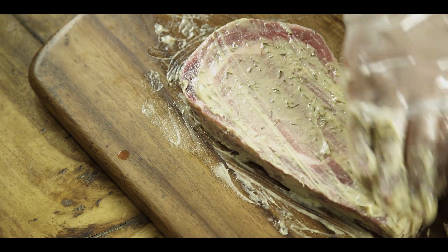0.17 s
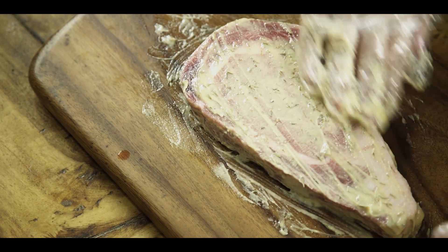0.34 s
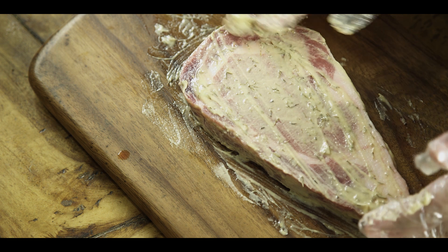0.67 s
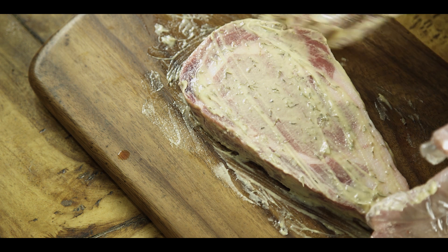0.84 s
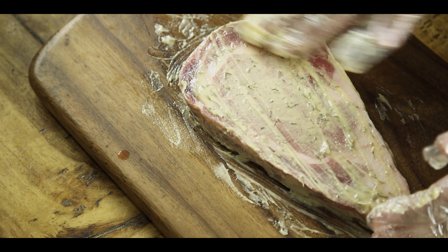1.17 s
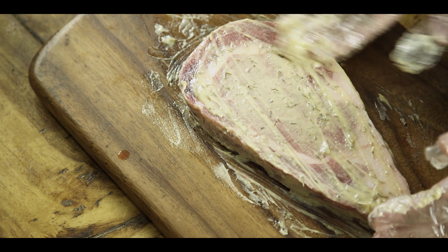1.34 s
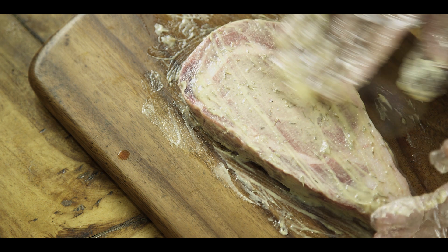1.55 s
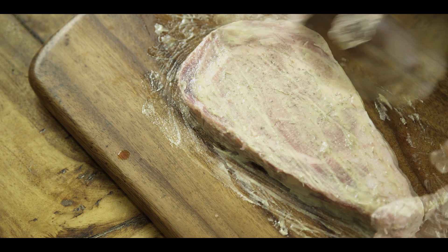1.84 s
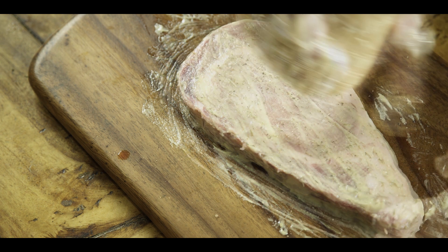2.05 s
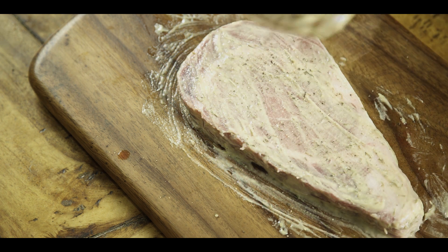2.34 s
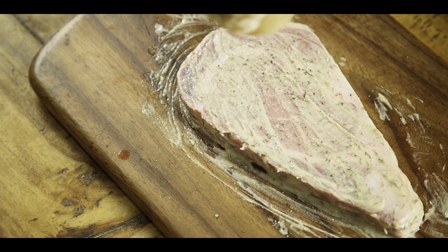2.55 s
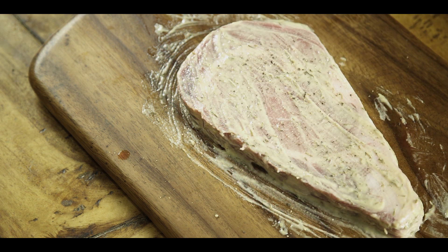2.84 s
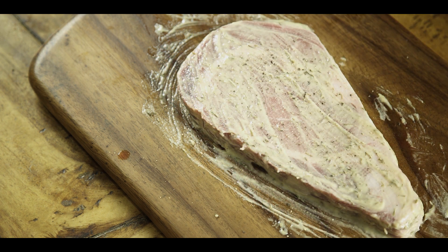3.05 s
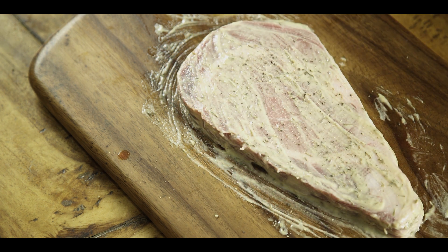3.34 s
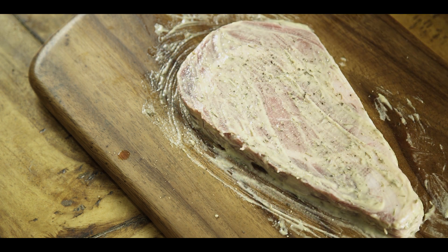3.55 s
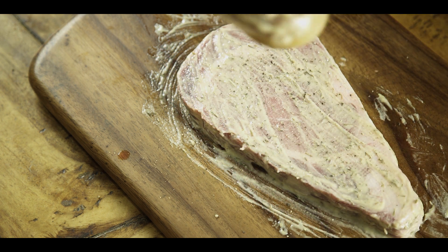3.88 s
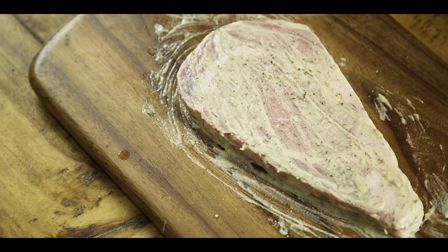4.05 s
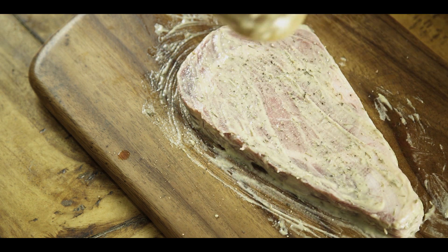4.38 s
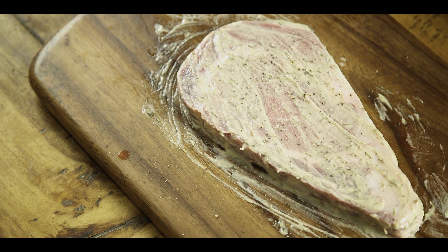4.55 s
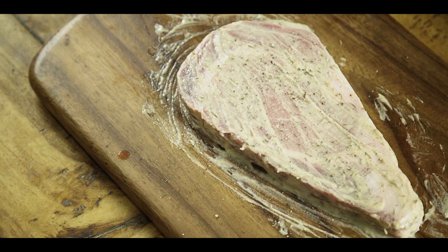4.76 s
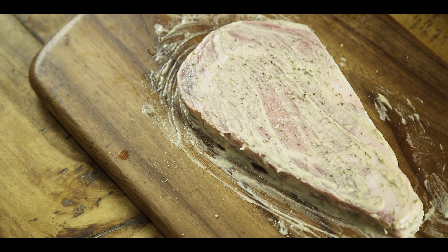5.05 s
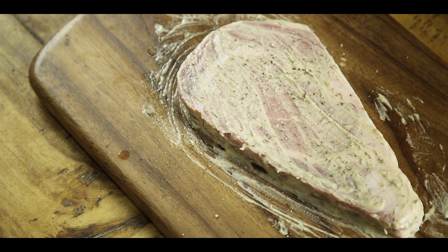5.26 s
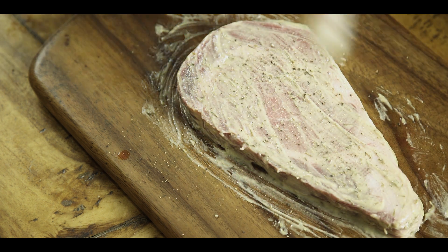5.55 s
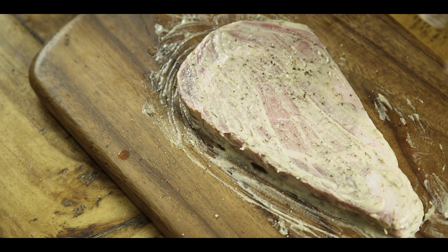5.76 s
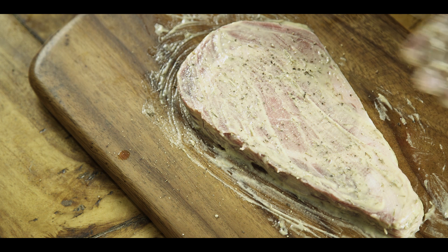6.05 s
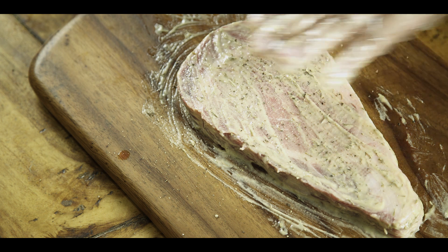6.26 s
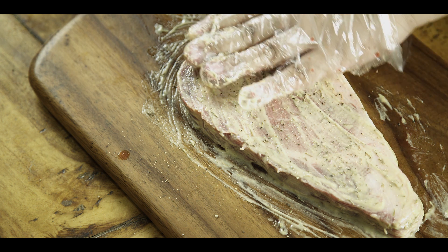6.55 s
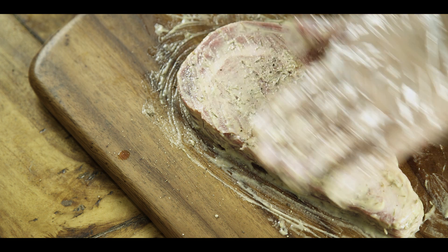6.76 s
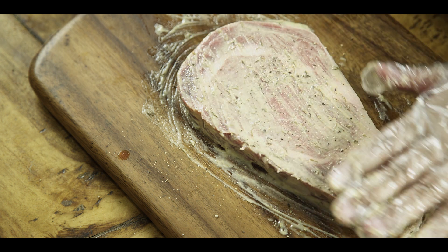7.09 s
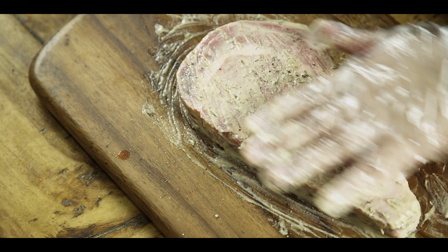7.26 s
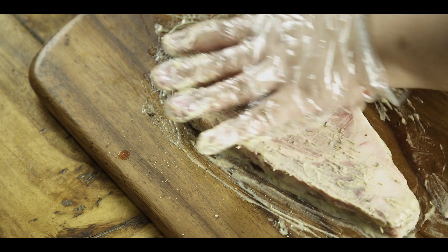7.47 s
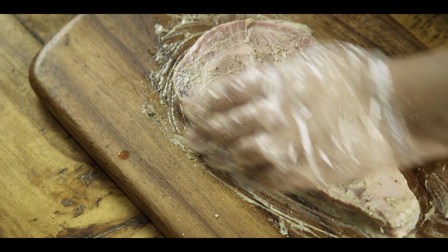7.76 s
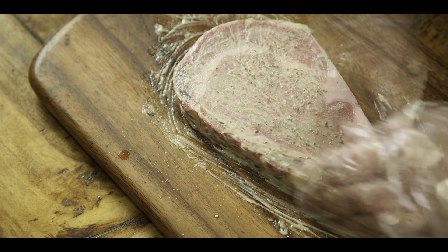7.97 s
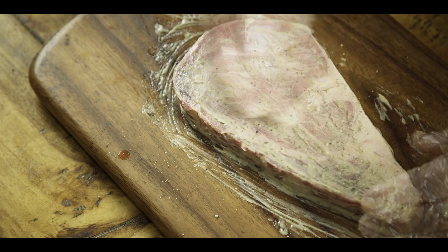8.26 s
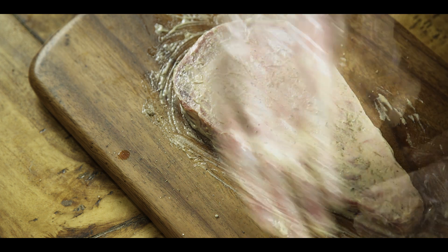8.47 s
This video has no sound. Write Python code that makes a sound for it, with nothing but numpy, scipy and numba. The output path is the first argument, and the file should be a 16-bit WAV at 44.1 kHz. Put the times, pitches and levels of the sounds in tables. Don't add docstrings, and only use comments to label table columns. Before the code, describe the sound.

Bright crackling film, full of tiny pops, swells with each hand stroke. After a couple of seconds the sound turns hollow and wetter as fingers scoop paste from a bowl about four times a second. A sudden dull double thump on the counter follows, with small rocking notes dying away. The glove then rubs the meat again, with slower strokes. Small hard-walled kitchen, close microphone, faint fridge hum.

```python
import sys
import numpy as np
from scipy import signal
from scipy.fft import rfft, irfft, next_fast_len
from scipy.io import wavfile
from scipy.ndimage import map_coordinates
from numba import njit

SR = 44100
rng = np.random.default_rng(int(sys.argv[2]) if len(sys.argv) > 2 else 0)


def ratio_of_db(decibels):
    return 10 ** (np.asarray(decibels, float) / 20)


def persist_wave(psi):
    counts = np.round(np.clip(psi, -1, 1) * 32767).astype(np.int16)
    wavfile.write(sys.argv[1], SR, np.atleast_2d(counts).T)


N = 380583


def level(x, db):
    return x * ratio_of_db(db) / np.sqrt(np.mean(x ** 2))


def shape(table, hz):
    f, db = np.transpose(table)
    return np.interp(np.log(hz), np.log(f), db)


def coloured(gain, x=None):
    size = next_fast_len(N)
    hz = np.maximum(np.arange(size // 2 + 1) * SR / size, 1)
    if x is None:
        x = rng.standard_normal(size)
    return irfft(rfft(x, size) * gain(hz), size)[:N]


def highpass(x, order, hz):
    return signal.sosfilt(signal.butter(order, hz, "high", fs=SR, output="sos"), x)


@njit
def rings(s, size, hz, t60, phase):
    out = np.zeros(N)
    for k in range(len(s)):
        z = size[k] * np.exp(1j * phase[k])
        turn = np.exp((2j * np.pi * hz[k] - np.log(1000) / t60[k]) / SR)
        start = int(s[k] * SR)
        for j in range(start, min(N, start + int(t60[k] * SR))):
            out[j] += z.imag
            z *= turn
    return out


def glove():
    # pitch_hz, density_db
    meat_bands = [(180, -40.5), (300, -7), (600, -8.5), (1200, -9), (2000, -8), (2550, -7.5), (2850, -6),
                  (4200, -2.5), (5790, 0), (7000, -4.5), (8500, -6.5), (12800, -5), (14300, -11),
                  (15700, -18)]
    # pitch_hz, density_db
    bowl_bands = [(200, -28.5), (300, -9), (500, -5.5), (850, -17), (1160, -13.5), (1400, -7.5),
                  (2230, -13), (2450, -6), (3000, -5), (4100, -6.5), (4450, -2), (5700, -0.5), (9340, -10),
                  (13000, -6), (15700, -15)]
    # time_s, share_inside_bowl (0-1)
    in_bowl = [
        (1.85, 0.2),
        (2, 0.76),
        (5.6, 0.86),
        (5.8, 0.02),
    ]
    # time_s, level_db
    crackle = [(0, 0), (.95, 0), (1.08, 2), (1.85, 1.5), (2, 0), (5.55, 0), (5.7, 3), (6.1, 3), (6.3, 0),
               (6.7, 2), (7.2, 2), (7.6, 0), (8.63, 1)]
    t = np.arange(N) / SR
    patches = rng.standard_normal((int(25 * N / SR) + 2, 13))
    fine = crinkle(patches, count=140000, fold=1, scatter_db=2.3, cycles=11.41, trim_db=(3, 9, 12), db=4.3)
    creases = crinkle(patches, count=1500, fold=10, scatter_db=2.6, cycles=9., trim_db=(1, 8, 12), db=5.6)
    film = fine + creases * ratio_of_db(np.interp(t, *np.transpose(crackle)))
    inside = np.clip(np.interp(t, *np.transpose(in_bowl)), 0, 1)
    over_meat = coloured(lambda f: ratio_of_db(shape(meat_bands, f)), film * (1 - inside))
    return over_meat + ratio_of_db(0.5) * coloured(lambda f: ratio_of_db(shape(bowl_bands, f)), film * inside)


def crinkle(patches, count, fold, scatter_db, cycles, trim_db, db):
    region_hz = [
        5200,
        11500,
        1800,
        500,
    ]
    folds = rng.random((count, 2))
    grains = rng.random((count, fold, 3))
    s = (folds[:, :1] * N / SR + .0009 * grains[..., 0]).ravel()
    hz = (320 + 15600 * grains[..., 1] ** 2).ravel()
    luck_db = np.repeat(-scatter_db * np.log(1.02 - folds[:, 1]), fold)
    t, film_db, *relative_db = hand()
    motion_db = np.interp(s, t, film_db)
    order = np.sort(region_hz)
    for k, centre in enumerate(region_hz[1:]):
        share = np.interp(np.log(hz), np.log(order), order == centre)
        material_db = np.interp(s, t, np.minimum(relative_db[k], 6)) + trim_db[k]
        motion_db = motion_db + share * material_db
    place = [s * SR / N * (len(patches) - 1), grains[..., 1].ravel() * 12]
    motion_db = motion_db + 2.6 * map_coordinates(patches, [s * SR / N * (len(patches) - 1), place[1]], order=1)
    size = ratio_of_db(db + motion_db + luck_db) * (hz / 5000) ** 0.9253
    flip = np.pi * (grains[..., 2].ravel() < .5)
    return rings(s, size, hz, cycles / hz, flip)


def hand():
    # peak_s, level_db,
    # rise_s and fall_s per 10 dB
    rubs = [(0.001, -43.5, 1.14, 0.09), (0.227, -46.5, 0.22, 0.07), (0.334, -46, 0.0063, 0.13),
            (0.548, -47, 0.5, 0.06), (0.681, -38.5, 0.09, 0.147), (0.843, -41, 0.03, 0.0765),
            (1.104, -46.5, 0.0743, 0.063), (1.223, -44.5, 0.0423, 0.1455), (1.433, -52.5, 0.06, 0.12),
            (1.6, -47, 0.15, 0.065), (1.752, -48.5, 0.05, 0.307), (5.332, -32.5, 0.0827, 0.0482),
            (5.52, -41, 0.1851, 0.085), (5.89, -52.5, 0.48, 0.46), (6.306, -40.5, 0.0647, 0.1221),
            (6.467, -45.5, 0.0275, 0.17), (6.937, -49.5, 0.5, 0.2), (7.313, -44.5, 0.2147, 0.67),
            (7.709, -35.5, 0.0839, 0.22), (8.045, -49.5, 0.24, 0.12), (8.192, -46.5, 0.12, 0.22),
            (8.489, -46.5, 0.15, 0.0351), (8.632, -49.5, 0.08, 0.32)]
    # start_s, hold_s, level_db
    scoops = [(2.014, 0.0723, -41.5), (2.193, 0.07, -46), (2.472, 0.0098, -39), (2.632, 0.11, -45.5),
              (2.892, 0.075, -40.5), (3.075, 0.087, -44.5), (3.3, 0.115, -43), (3.556, 0.105, -41.5),
              (3.787, 0.105, -42), (4.045, 0.12, -44), (4.277, 0.0443, -39.5), (4.469, 0.12, -43.5),
              (4.676, 0.054, -43.5), (4.858, 0.1686, -46), (5.126, 0.082, -41.5)]
    # peak_s, level_db, fall_s per 10 dB
    openings = [(.335, -43, 0.05), (.42, -52.5, 0.11), (1.14, -51.5, 0.15), (1.43, -54.5, .1),
                (1.765, -46.5, 0.0432), (2.26, -48.5, 0.06), (3.15, -49, 0.06), (4.225, -49, 0.27),
                (4.69, -45, 0.11), (5.52, -44, 0.0667), (6.97, -53, 0.2), (7.72, -39, 0.04),
                (8.48, -54, .03), (1.2, -52, .05), (6.25, -54, .05), (2.48, -46, .06), (3.35, -49, .06),
                (3.84, -49, .07), (5.7, -56, .3), (2.74, -50, .05), (5.05, -53, .1), (6.66, -54, .06),
                (7.18, -54, .05), (4.13, -52, .06), (3.44, -53, .05), (4.55, -50, .1), (5.44, -50, .1),
                (6.75, -55, .3), (7.3, -53, .3), (2.94, -47, .05), (3.65, -47, .04)]
    # peak_s, wet_db, push_db, fall_s per 10 dB
    squelches = [(.35, -47.5, -61, 0.14), (2.26, -45.5, -51.5, 0.0134), (2.08, -52, -55, .04),
                 (2.73, -47, -56, .04), (4.5, -50, -52, .06), (2.91, -54.5, -52.5, 0.0553),
                 (3.15, -44.5, -49, 0.0778), (3.39, -52.5, -53, 0.0261), (3.67, -45.5, -50, 0.0254),
                 (4.12, -43, -51, 0.0052), (4.59, -42.5, -50, 0.0364), (4.69, -47, -48, 0.03),
                 (4.96, -44, -50, .06), (5.17, -46, -70, .25), (5.74, -53, -64, .15), (8.05, -53, -62, .08),
                 (5.36, -40, -71, 0.0849), (5.55, -42, -72.5, 0.0623), (6.11, -50, -45, 0.32),
                 (.68, -50, -60, .1), (6.75, -54, -62, .2), (6.5, -52, -62, .08), (.08, -51, -56, .06),
                 (.23, -53, -62, .05), (.75, -50, -56, .12), (7.98, -54, -62, .05), (8.52, -54, -58, .05),
                 (7.33, -52, -60, .1), (7.71, -43, -56, .1)]
    # level_db at an average stroke, slope (dB per dB of film)
    followers = [
        (-54, 1.0),
        (-55.5, .65),
        (-61, .4),
    ]
    average_db = -47
    t = np.arange(0, N / SR + .01, .004)
    s, db, rise_s, fall_s = np.transpose(rubs)
    rubbing = swells(t, s, db, 10 / rise_s, 10 / fall_s)
    start, hold_s, db = np.transpose(scoops)
    scooping = swells(t, start, db, 200, 158, hold_s)
    film_db = 10 * np.log10(rubbing + scooping)
    crisp, wet, push = (ratio_of_db(mean_db + slope * (film_db - average_db)) ** 2 for mean_db, slope in followers)
    push = push * ratio_of_db(-14 * (t > 5.05) * (t < 5.66)) ** 2
    wet = wet * ratio_of_db(-1.5 * (t > 1.03) * (t < 1.5)) ** 2
    s, db, fall_s = np.transpose(openings)
    crisp = crisp + swells(t, s, db, 10 / .0343, 10 / fall_s)
    s, wet_db, push_db, fall_s = np.transpose(squelches)
    wet = wet + swells(t, s, wet_db, 10 / .0482, 10 / fall_s)
    push = push + swells(t, s, push_db, 10 / .0482, 10 / fall_s)
    return t, film_db, *(10 * np.log10(power) - film_db for power in (crisp, wet, push))


def swells(t, s, db, rise_db_s, fall_db_s, hold_s=0):
    late = t[:, None] - s
    drop_db = np.maximum(0, np.maximum(-late * rise_db_s, (late - hold_s) * fall_db_s))
    return (ratio_of_db(db - drop_db) ** 2).sum(axis=1)


def fold_snaps():
    # start_s, peak_db, ring_hz
    open_snaps = [(0.2064, -30, 5400), (0.2972, -30, 4130), (0.3398, -30, 5790), (0.5654, -28, 5730),
                  (0.618, -25, 4340), (0.8624, -27, 4220), (0.9239, -31, 5500), (0.9891, -42, 6240),
                  (1.0119, -40, 4820), (1.2341, -28, 6010), (1.2406, -32, 5840), (1.2621, -29, 4300),
                  (1.2853, -29, 4030), (1.3595, -39, 5680), (1.4285, -32, 4070), (1.7748, -29, 3900),
                  (1.4863, -42, 6350), (1.501, -35, 3750), (1.507, -36, 4240), (1.5196, -33, 6160),
                  (1.5317, -34, 4460), (1.5872, -27, 5100), (1.7475, -33, 4600), (1.7972, -29, 3790),
                  (5.7616, -38, 5400), (5.7879, -37, 4460), (5.9434, -39, 6800), (5.9609, -41, 5250),
                  (5.9658, -37, 6550), (5.9822, -36, 5770), (6.0009, -31, 6140), (6.0629, -30, 4970),
                  (6.1523, -39, 6330), (6.3189, -27, 5770), (6.3365, -27, 5840), (6.3408, -28, 5640),
                  (6.4503, -34, 5150), (6.4575, -31, 5060), (6.7149, -34, 2950), (6.7484, -35, 5680),
                  (6.8882, -37, 5600), (6.9343, -33, 2990), (6.9698, -35, 5320), (6.9895, -32, 6070),
                  (7.037, -34, 5060), (7.0676, -37, 4780), (7.2193, -35, 5250), (7.3324, -30, 5810),
                  (7.421, -31, 4950), (7.488, -31, 5910), (7.8, -20, 5940), (7.8463, -20, 6090),
                  (7.8886, -28, 5860), (7.8981, -28, 5230), (7.9861, -30, 4630), (8.1103, -32, 5450),
                  (8.1592, -27, 5360), (8.2013, -27, 5060), (8.4655, -29, 5190), (8.4851, -32, 5000)]
    # start_s, peak_db, ring_hz, low_share_db
    bowl_snaps = [(1.9865, -25, 6000, -14), (2.0033, -21, 5250, -23), (2.0362, -28, 5510, -27),
                  (2.1782, -36, 4930, -18), (2.2037, -26, 5500, -15), (2.2206, -25, 4670, -37),
                  (2.2463, -31, 4910, -5), (2.3217, -36, 6030, -16), (2.4648, -16, 5700, -24),
                  (2.667, -26, 4370, -26), (2.682, -28, 6160, -16), (2.8803, -17.5, 5730, -18),
                  (2.9585, -22, 4970, -29), (2.9814, -28, 4670, -17), (3.0006, -36, 5320, -14),
                  (3.0388, -31, 5770, -25), (3.0597, -32, 5510, -22), (3.4266, -37, 5680, -10),
                  (3.5481, -27, 5790, -19), (3.5637, -27, 5500, -14), (3.5876, -23, 5500, -21),
                  (3.5953, -23, 5100, -11), (3.6685, -24, 4300, -13), (3.8413, -33, 4390, -14),
                  (3.891, -24, 4520, -29), (3.9377, -29, 4610, -24), (4.0155, -32, 4500, -30),
                  (4.0384, -22.5, 4410, -18), (4.1431, -23, 5940, -16), (4.1534, -21, 5500, -15),
                  (4.2642, -18, 5640, -18), (4.301, -26, 5590, -30), (4.4296, -30, 4520, -29),
                  (4.4966, -20, 4390, -9), (4.5046, -28, 4740, -21), (4.5379, -24, 5790, -22),
                  (4.5918, -24, 4300, -11), (4.6719, -28, 5500, -24), (4.8737, -34, 4410, -17),
                  (4.8908, -28, 6050, -21), (5.1047, -21, 5500, -20), (5.1533, -24, 5610, -14),
                  (5.229, -30, 4500, -14), (5.288, -23, 5670, -28), (5.3535, -21, 5600, -25),
                  (5.4709, -23, 5450, -20), (5.5031, -29, 4190, -7), (5.5739, -32, 5040, -2),
                  (5.6168, -33, 3600, -8)]
    # start_s, peak_db, ring_hz
    ticks = [(0.0964, -41, 13350), (0.3333, -26, 10650), (0.7632, -31, 8850), (0.9484, -42, 8910),
             (1.0014, -45, 9280), (1.0468, -43, 10010), (1.0614, -37, 10010), (1.1189, -31, 9970),
             (1.1362, -34, 10420), (1.1579, -32, 10530), (1.3328, -35, 12940), (1.4272, -33, 10500),
             (1.2, -34, 11500), (1.47, -37, 8500), (1.4305, -31, 10570), (1.501, -37, 9130),
             (1.5051, -40, 11370), (1.5435, -32, 8200), (1.6227, -36, 11220), (1.6753, -42, 10490),
             (1.7364, -37, 12320), (1.7748, -35, 11430), (1.7972, -35, 10570), (1.8161, -39, 12490),
             (2.2376, -36, 13630), (4.229, -32, 13090), (4.6491, -32, 10940), (5.7881, -41, 9320),
             (5.8107, -42, 9930), (5.8499, -43, 13910), (5.8633, -43, 8010), (5.8929, -42, 12230),
             (5.9261, -39, 12400), (5.9305, -39, 12860), (5.9471, -42, 9780), (6.0009, -43, 9860),
             (6.0152, -38, 10340), (6.7488, -31, 9000), (6.9702, -30, 11260), (7.022, -31, 10400),
             (7.0673, -38, 11410), (7.0917, -43, 10400), (7.106, -36, 8200), (7.4884, -31, 11330),
             (7.889, -35, 10360), (8.1101, -31, 10230), (8.1647, -37, 8250), (8.392, -39, 12270),
             (8.4959, -31, 13330)]
    out = snaps(*np.transpose(open_snaps), low_db=-22, crisp_db=-13.5)
    out = out + snaps(*np.transpose(bowl_snaps), crisp_db=-21.5)
    return out + snaps(*np.transpose(ticks), low_db=-30, crisp_db=-10)


def snaps(s, db, hz, low_db, crisp_db):
    zero = 0 * s
    chance = rng.random((len(s), 4, 4))
    out = rings(s, ratio_of_db(db), hz, .003 + 5 / hz, zero) - rings(s, ratio_of_db(db), hz, 4 / hz, zero)
    for late, near, low, high in chance.transpose(1, 2, 0):
        out = out + rings(s + .001 * late, ratio_of_db(db - 11), hz * 1.7 ** (near - .55), .0028 + zero, zero)
        out = out + rings(s + .0009 * late, ratio_of_db(db + low_db - 9), 1150 + 1500 * low, .009 + zero, zero)
        out = out + rings(s + .0006 * late, ratio_of_db(db + crisp_db - 1), 7500 + 6500 * high, .002 + zero, zero)
    return out


def paste_smacks():
    # start_s, peak_db, cavity_hz, t60_s
    smacks = [(2.204, -34, 3150, 0.0117), (3.5616, -33, 3240, 0.0144), (3.587, -28.5, 3256, 0.0107),
              (3.6404, -37.5, 1710, 0.0187), (3.668, -29, 2306, 0.019), (4.1143, -36.5, 1340, 0.016),
              (4.1534, -26.5, 2900, 0.0121), (4.4965, -30, 1450, 0.01), (4.583, -32, 2434, 0.0153),
              (6.0833, -22, 1080, 0.022), (6.0838, -30, 1800, .018), (6.084, -37, 3100, .012),
              (5.1052, -36, 1850, .012), (6.084, -40, 5600, .007), (2.683, -40, 1500, .012),
              (2.835, -45, 1500, .012), (3.135, -38, 1400, .012), (3.428, -42, 1500, .012),
              (3.572, -42, 1400, .012), (3.922, -42, 1400, .012), (4.1635, -36, 1700, .012),
              (4.2645, -33, 3300, .01), (5.601, -40, 2200, .012), (6.933, -47, 2000, .012),
              (4.6718, -28.5, 3130, 0.0155), (5.1048, -28, 3097, 0.0099), (4.592, -31, 2500, 0.012),
              (5.3515, -32, 1600, 0.014), (5.358, -33, 1330, .022), (5.546, -36, 1900, .016),
              (5.51, -40, 2150, .02), (5.662, -42, 2400, .012), (4.5925, -33, 1100, .008),
              (4.0375, -38, 1350, .012), (4.1538, -35, 1500, .01), (5.5822, -30.5, 2300, 0.0175),
              (5.7367, -40, 1900, 0.0148), (5.7643, -37, 1494, 0.0174)]
    return taps(smacks, 0.00166, spread=0.343)


def finger_bumps():
    # start_s, peak_db, pitch_hz, t60_s
    bumps = [(2.244, -37, 540.7, 0.0476), (2.461, -41.5, 526, 0.049), (2.655, -52, 350, 0.053),
             (2.875, -40, 328, 0.046), (2.909, -40, 558, 0.048), (3.109, -40, 303, 0.057),
             (4.109, -34.5, 475, 0.046), (4.262, -40, 358, 0.043), (4.5905, -33, 480, 0.04),
             (4.789, -44, 309, 0.052), (4.945, -33, 387, 0.0346)]
    return taps(bumps, 0.0136, spread=0.218)


def taps(table, rise_s, spread, side_db=-7):
    s, db, hz, t60 = np.transpose(table)
    out, zero, t60 = 0, 0 * s, np.maximum(t60, 1.5 * rise_s)
    for k, off in enumerate(rng.random((len(s), 3)).T):
        ring_hz = hz * (1 + spread) ** ((k - 1) * (.4 + off))
        size = ratio_of_db(db + 2 + side_db * abs(k - 1))
        out = out + rings(s, size, ring_hz, t60, zero) - rings(s, size, ring_hz, rise_s + zero, zero)
    return out


def bowl():
    # start_s, blow_db, contact_s
    knocks = [
        (6.0829, -8, 0.0013),
        (6.0852, -6.5, 0.0013),
        (6.1042, -9, 0.0015),
        (6.114, -16, 0.0016),
        (6.132, -29, 0.001),
        (6.156, -28, 0.00108),
        (6.169, -28, 0.00143),
    ]
    # pitch_hz, level_db, t60_s
    counter = [(137, 0, 0.14), (250, 0, 0.035), (297, 1, 0.09), (375, -14, 0.12), (415, -14.5, 0.15),
               (502, -7, 0.12), (560, -3, 0.05), (660, 4, 0.055), (776, 4.5, 0.04), (875, -10, 0.12),
               (960, -3, .025), (1100, 1, 0.022), (1310, 4, 0.03), (1750, -5, .02)]
    out = np.zeros(N)
    hz, mode_db, t60 = np.transpose(counter)
    for s, db, contact_s in knocks:
        samples = int(contact_s * SR)
        push = np.sin(np.pi * np.arange(samples) / samples)
        spot = ratio_of_db(2 * rng.standard_normal(len(hz)))
        ring = rings(s + 0 * hz, ratio_of_db(db + mode_db - 3.5) * spot, hz, t60, 0 * hz)
        out = out + signal.oaconvolve(ring, push / push.sum())[:N]
    landing_s, one = knocks[0][0], np.ones(1)
    panel = rings(landing_s * one, ratio_of_db(-5.5) * one, 211. * one, .32 * one, 0 * one)
    settled = np.clip((np.arange(N) / SR - 6.126) / .012, 0, 1)
    out = out + panel * ratio_of_db(-17 * settled)
    late, pitch, sign = rng.random((300, 3)).T
    chatter_hz = 310 * 5 ** pitch
    size = ratio_of_db(-30 - 16 * late - 14 * pitch)
    out = out + rings(landing_s + .25 * late, size, chatter_hz, 14 / chatter_hz, np.pi * (sign < .5))
    return highpass(out, 3, 190)


def bowl_rocks():
    # start_s, peak_db, pitch_hz, t60_s
    rocks = [
        (6.128, -26, 378, .2),
        (6.128, -31, 670, .22),
        (6.15, -26.5, 503, .15),
        (6.19, -33, 345, .12),
        (6.237, -38, 222, .1),
        (6.328, -32, 217, 0.08),
        (6.348, -33.5, 215, 0.085),
        (6.416, -41.5, 203, 0.069),
        (6.453, -35, 215, 0.075),
    ]
    return taps(rocks, .02, spread=.25, side_db=-17)


def floor_thud():
    # start_s, peak_db, pitch_hz, t60_s
    thud = [
        (6.086, -46, 90, .3),
        (6.09, -56, 62, .5),
    ]
    return taps(thud, .03, spread=.2)


def room_echo(near):
    t60_s, damp = 0.212, 0.41
    lags = rng.integers(400, 2200, 8)
    thin = highpass(near, 2, 280)
    return ratio_of_db(-14) * walls(thin + 1e-18, lags, ratio_of_db(-60 * lags / SR / t60_s), damp)


@njit
def walls(x, lags, gain, damp):
    line, soft, out = np.zeros((8, 4096)), np.zeros(8), np.zeros(len(x))
    for i in range(len(x)):
        total = 0.
        for k in range(8):
            soft[k] += (1 - damp) * (gain[k] * line[k, (i - lags[k]) & 4095] - soft[k])
            total += soft[k]
        out[i] = soft[0] - soft[3] + soft[5] - soft[6]
        for k in range(8):
            line[k, i & 4095] = x[i] + soft[k] - total / 4
    return out


def kitchen():
    # pitch_hz, density_db
    air_bands = [(12, -15), (20, 10), (35, 3), (55, -1.5), (100, 4.5), (137, 5.5), (186, 4), (298, 7.5),
                 (363, 1), (651, -4.5), (1140, -6.5), (1590, -12), (2350, -13), (5560, -8.5), (8450, -11.5),
                 (12800, -23.5), (15600, -26)]
    # pitch_hz, level_db, waver_db, fade_db_per_s
    hum = [
        (60, -64, 1., -.6),
        (180, -65, 1.3, -.3),
        (300, -68.5, 2., -.3),
        (15734, -81, 1.5, 0),
    ]
    t = np.arange(N) / SR
    out = level(coloured(lambda f: ratio_of_db(shape(air_bands, f))), -55.5)
    for hz, db, waver_db, fade_db in hum:
        waver = level(coloured(lambda f: 1 / (1 + (f / 1.5) ** 2)), 0)
        swell = np.sqrt(2) * ratio_of_db(db + waver_db * waver + fade_db * t)
        out = out + swell * np.sin(2 * np.pi * hz * t + 0.4 * waver)
    return out


def scene():
    near = glove() + fold_snaps() + paste_smacks() + finger_bumps() + bowl() + bowl_rocks()
    near = highpass(near, 2, 130)
    return (near + room_echo(near) + floor_thud() + kitchen())[None]


@njit
def follow(x, attack, release):
    out, e = np.empty(len(x)), 0.
    for i in range(len(x)):
        e += (abs(x[i]) - e) * (attack if abs(x[i]) > e else release)
        out[i] = e
    return out


def roll_off(x):
    return signal.sosfilt(signal.butter(12, 15820, fs=SR, output="sos"), x)


def record(dry):
    envelope = follow(dry[0], 0.0054, 1 / (.043 * SR))
    gain = np.minimum(1, ratio_of_db(-22) / (envelope + 1e-9)) ** .5
    rounded = 0.7378 * np.tanh(dry * gain / 0.7625)
    mix = highpass(rounded, 2, 48)
    mix = signal.sosfilt(signal.ellip(10, .2, 70, 15770, fs=SR, output="sos"), mix)
    return roll_off(mix)


dry = scene()
out = record(dry)
persist_wave(out)
```